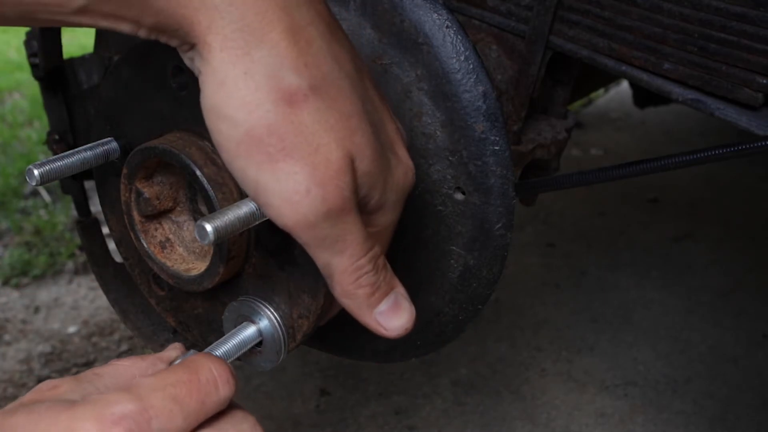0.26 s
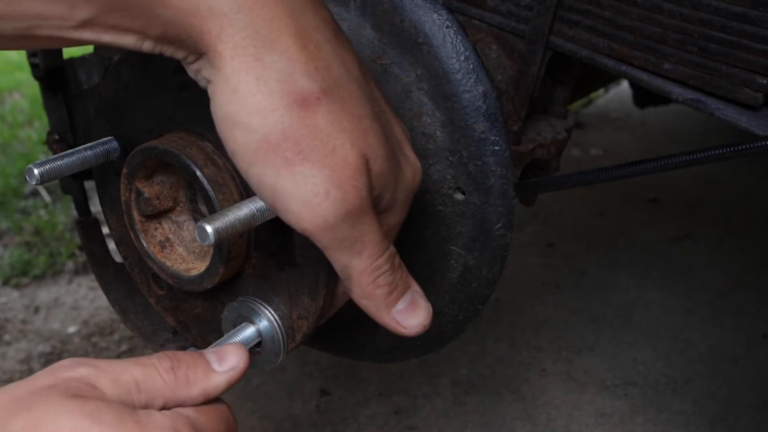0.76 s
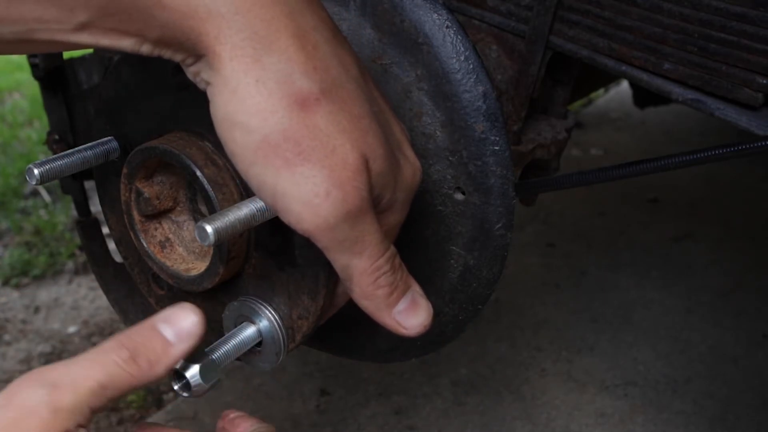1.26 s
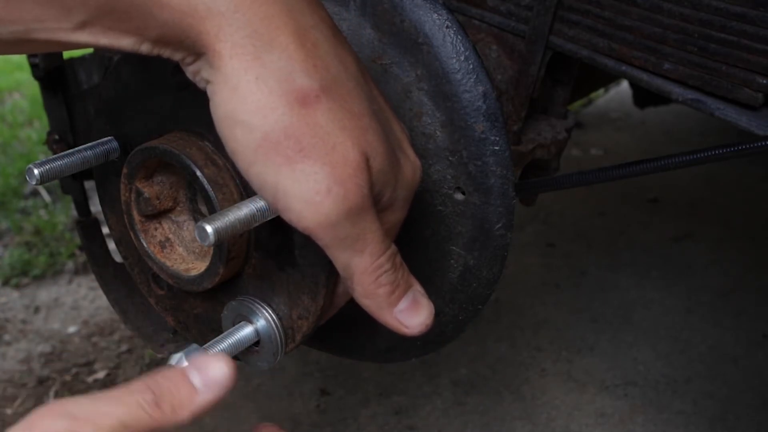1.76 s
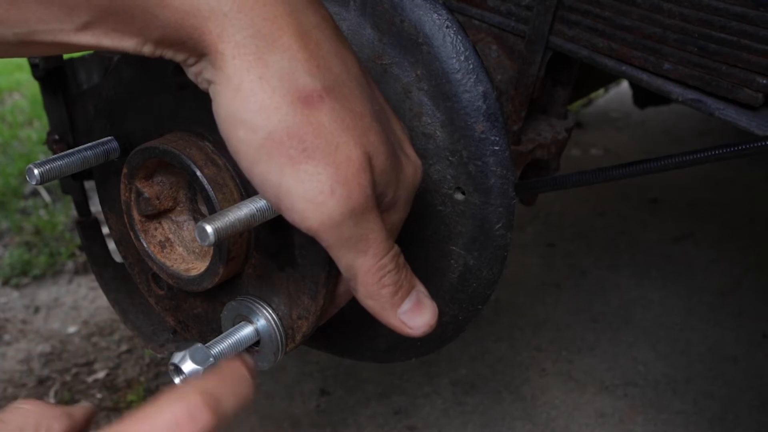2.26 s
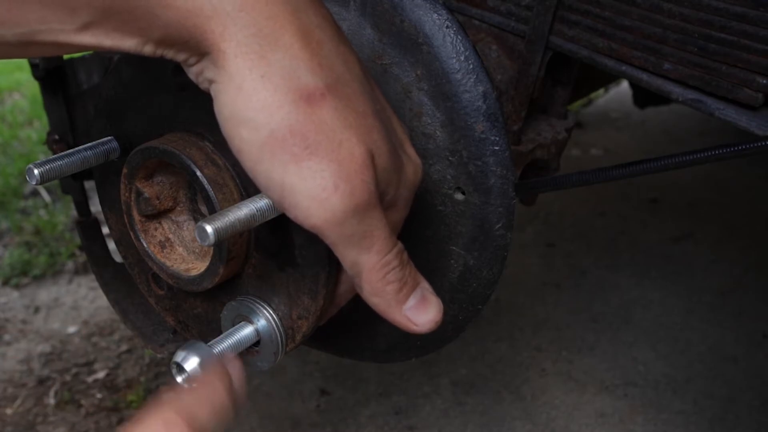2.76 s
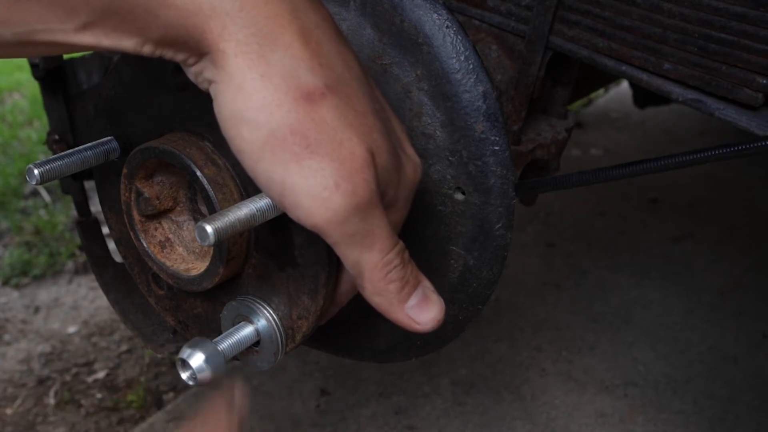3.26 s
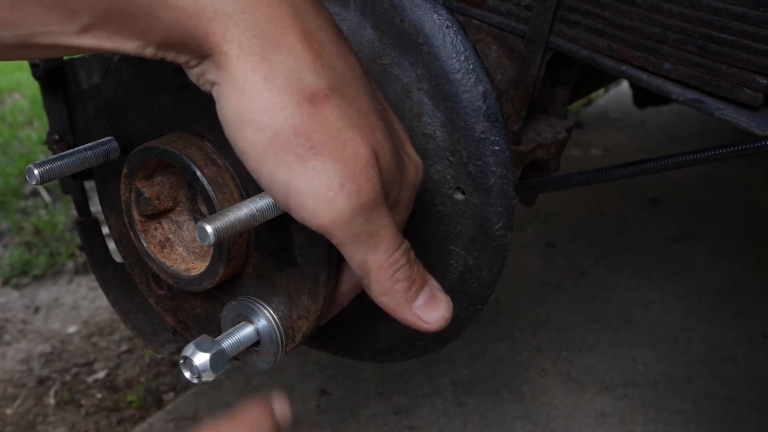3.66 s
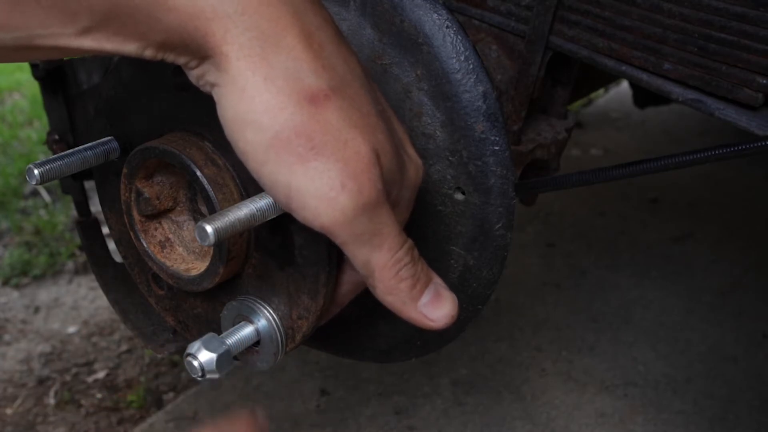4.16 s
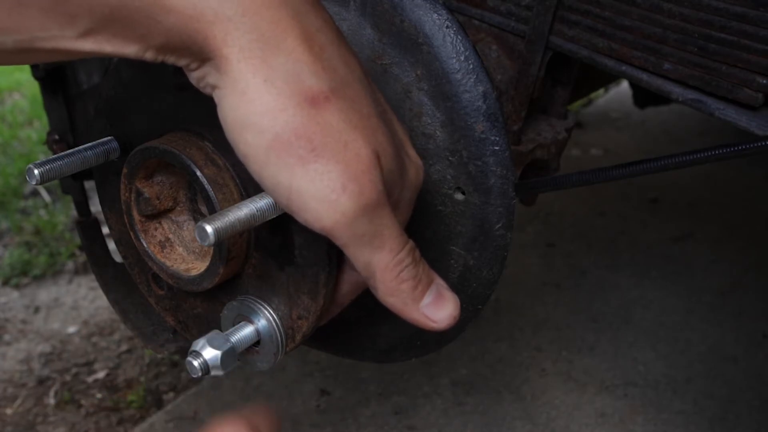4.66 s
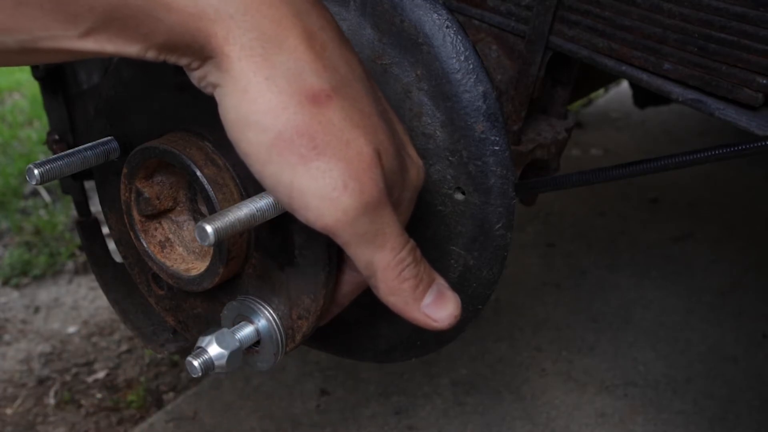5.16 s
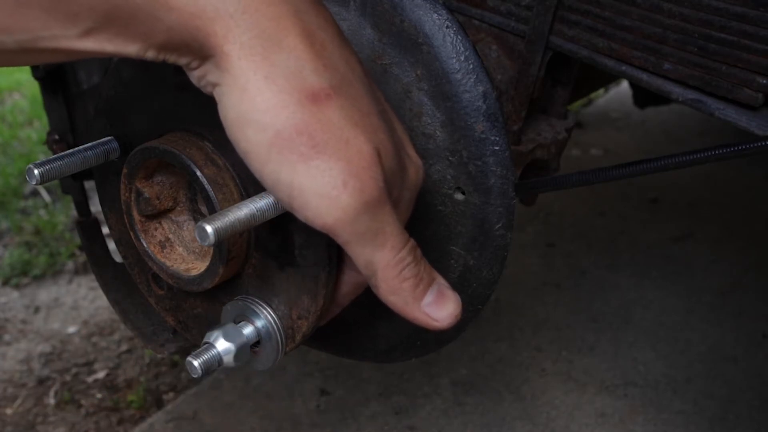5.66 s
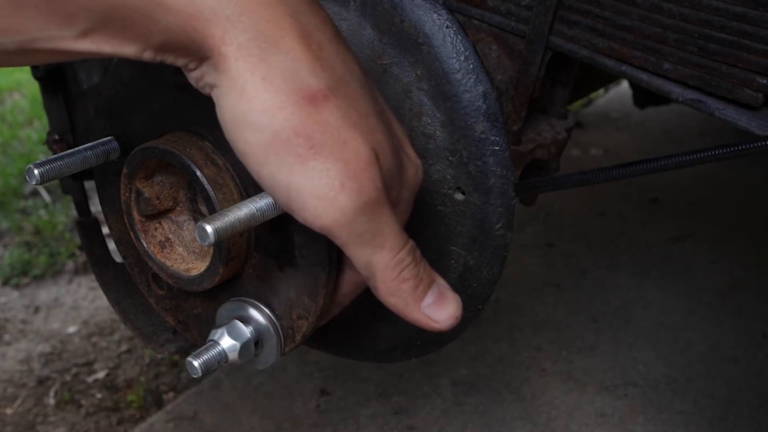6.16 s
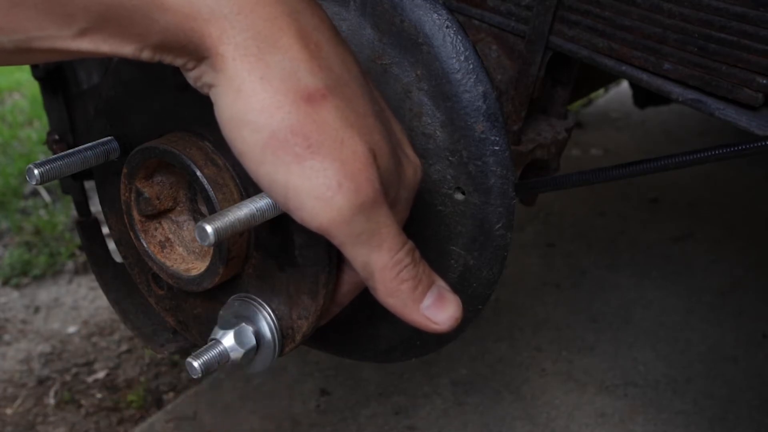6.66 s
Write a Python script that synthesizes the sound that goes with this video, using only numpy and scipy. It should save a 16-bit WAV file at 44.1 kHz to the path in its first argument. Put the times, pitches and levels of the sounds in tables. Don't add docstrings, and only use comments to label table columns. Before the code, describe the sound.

A stereo microphone near a rusty hub catches quiet metal rubs and ticks, then an even series of crisp, slightly ringing clicks as a loose nut is spun along a threaded stud. Each is trailed by a grainy buzz. Late strikes turn harder and clattery as the nut hits the washers. Low traffic, steady hum, light hiss, a passing engine and gliding bird notes stay in the background, with little echo.

```python
import sys
import numpy as np
from scipy import signal
from scipy.fft import rfft, irfft, next_fast_len
from scipy.io import wavfile
from scipy.ndimage import uniform_filter1d, map_coordinates

SR = 44100
rng = np.random.default_rng(int(sys.argv[2]) if len(sys.argv) > 2 else 0)


def how_loud(loudness_db):
    steps = np.asarray(loudness_db, float) / 20
    return 10 ** steps


def int16_out(signal):
    q = np.round(np.clip(np.atleast_2d(signal).T, -1, 1) * 32767)
    wavfile.write(sys.argv[1], SR, q.astype(np.int16))


N = 304696


def unit(x):
    return x / np.sqrt(np.mean(x ** 2) + 1e-20)


def along(points, hz):
    f, v = np.transpose(points)
    return np.interp(np.log(hz + 1), np.log(f + 1), v)


def wobble(rate):
    knots = rng.standard_normal(int(N * rate / SR) + 4)
    return map_coordinates(knots, [np.arange(N) * rate / SR])


def filtered(x, response):
    n = x.shape[-1]
    m = next_fast_len(n + 8192)
    return irfft(rfft(x, m) * response(np.fft.rfftfreq(m, 1 / SR)), m)[..., :n]


def resonant(peaks):
    def response(f):
        total = 0
        for k, (centre, width, db) in enumerate(peaks):
            band = 1j * f * width
            total = total + (-1) ** k * how_loud(db) * band / (centre * centre - f * f + band)
        return total
    return response


def spread(pair, alike, lean=((100, 0), (9000, 0))):
    def mid_side(hz):
        turn = np.arccos(np.clip(along(alike, hz), -1, 1)) / 2
        return np.array([np.cos(turn), np.sin(turn)])
    mid, side = filtered(pair, mid_side)
    return filtered(np.array([mid + side, mid - side]), lambda hz: how_loud(along(lean, hz) * [[.5], [-.5]]))


def dying(t60s, seconds):
    n = int(seconds * SR)
    hz, t, z = signal.stft(rng.standard_normal((2, n)), SR, nperseg=64)
    return signal.istft(z * how_loud(-60 * t / along(t60s, hz)[:, None]), SR, nperseg=64)[1][:, :n]


# (frequency [Hz], coherence [-1 to 1])
AIR_LIKENESS = [(30, .977), (70, .988), (130, .975), (290, .92), (640, .68), (1410, .3), (3100, -.25),
                (6820, .03), (15000, 0)]


def rush(response, patchy_db):
    z = signal.stft(rng.standard_normal((2, N)), nperseg=512)[2]
    field = uniform_filter1d(rng.standard_normal(z.shape[1:]), size=4, axis=0)
    field = uniform_filter1d(field, size=14, axis=1)
    pair = signal.istft(z * how_loud(patchy_db * unit(field)), nperseg=512)[1][:, :N]
    return unit(spread(filtered(pair, response), AIR_LIKENESS))


# (departure [s], arrival [s])
TRAVEL_S = (2.37, 6.64)


def frame_rocking(t):
    flick_s = np.array(FLICKS)[:, :1]
    since = np.clip(t - flick_s, 0, 9) / 0.066
    return np.max(since * np.exp(1 - since) * np.interp(flick_s, TRAVEL_S, [.6, 1]), axis=0)


# (time [s], effort [0-1])
PASS_EFFORT = [
    (.7, 0),
    (.85, 0.82),
    (1.05, 0.95),
    (1.2, 0.38),
    (1.45, 0.8),
    (1.75, 0.97),
    (2.15, 0.89),
    (2.35, 0.052),
]


def passing(t):
    return np.clip(np.interp(t, *np.transpose(PASS_EFFORT), left=0, right=0), 0, 2)


# (frequency [Hz], density [dB per Hz])
RUMBLE = [(13, -40), (25, -15), (42, -3.5), (59, 3), (102, -4.5), (110, -0.5), (124, -13.5), (170, -6.5),
          (220, -37), (370, -120)]
DRONE = [(65, -84), (110, -9), (124, -1.5), (183, -2.5), (312, -9), (330, -48), (430, -21), (730, -120)]
WHINE = [(190, -85), (320, -10), (374, -3), (427, -3), (467, -6.5), (560, -18), (730, -48), (1230, -120)]
RUSH = [(320, -15.5), (540, -8), (593, -2.5), (1060, -8), (1370, -9), (2460, -16), (3480, -18), (4000, -26),
        (5000, -33), (6500, -57), (11000, -120)]
# (time [s], level [dB])
TRAFFIC = [(0, -40.5), (.75, -42), (1.15, -39), (1.45, -39.5), (1.95, -38.5), (2.5, -40.5), (2.95, -40.5),
           (3.6, -40.5), (4.1, -42), (5.4, -42.5), (6.91, -44)]
# (level over mean traffic [dB], share of traffic swings [ratio], rise in the pass [dB],
#  rise when the frame rocks [dB], sway [dB])
LAYERS = [
    (1, 1.5, 0.5, 1.5, -2.5),
    (-4.5, 1.1, 1, 8, -1),
    (-7.5, 0.21, 3, 7, 3.2),
    (-10.5, 0.02, -1, -0.5, -1),
]


def far_traffic(t):
    traffic_db = np.interp(t, *np.transpose(TRAFFIC))
    mean_db = traffic_db.mean()
    effort, rocking = passing(t), frame_rocking(t)
    out = np.zeros((2, N))
    for (db, share, pass_db, rock_db, sway_db), points in zip(LAYERS, (RUMBLE, DRONE, WHINE, RUSH)):
        level_db = db + mean_db + share * (traffic_db - mean_db)
        level_db += pass_db * effort + rock_db * rocking
        level_db += np.clip(sway_db, -1.5, 1.5) * wobble(3.87)
        out += how_loud(level_db) * rush(lambda hz: how_loud(along(points, hz)), patchy_db=1.5)
    return out


# (frequency [Hz], pitch sway [Hz], level [dB])
HUM = [(96.1, 0.59, -45.5), (192.3, 7.4, -51), (287.4, 6.04, -52)]


def machine_hum():
    out = np.zeros(N)
    for hz, sway, db in HUM:
        phase = 2 * np.pi * np.cumsum(hz + sway * wobble(12)) / SR
        out += how_loud(db + 3 + 1.4 * wobble(5)) * np.sin(phase)
    return out


# (frequency [Hz], pitch sway [Hz], level [dB])
PASS_NOTE = (372, 18, -41.5)


def passing_engine(t):
    hz, sway, db = PASS_NOTE
    phase = 2 * np.pi * np.cumsum(hz + sway * wobble(30)) / SR
    return passing(t) * how_loud(db + 1.7 * wobble(7.86)) * np.sin(phase)


# (frequency [Hz], density [dB per Hz])
HISS = [(2500, -24), (4000, 2), (4800, -1.5), (6100, 2.5), (11500, 1), (14000, -5.5), (15750, -7),
        (15850, -60)]


def air():
    t = np.arange(N) / SR
    hiss = how_loud(-62) * rush(lambda hz: how_loud(along(HISS, hz)), patchy_db=-2.5)
    return hiss + far_traffic(t) + machine_hum() + passing_engine(t)


# (start [s], length [s], first pitch [Hz], last pitch [Hz], level [dB])
CLEAR_NOTES = [(0, .1, 4100, 4000, -75), (.12, .12, 5050, 5350, -76), (.41, .09, 2260, 2280, -71),
               (.68, .19, 5560, 5640, -81), (0, .18, 8000, 8000, -78), (.88, .07, 7250, 7050, -81),
               (.94, .07, 7050, 6300, -81),
               (1.735, 0.16, 3260, 3280, -69), (1.81, 0.125, 2700, 2720, -70), (2.7, 0.11, 2600, 2850, -75),
            (2.82, .14, 2810, 2780, -71), (2.93, 0.12, 3350, 3150, -65), (3.04, 0.26, 2650, 2630, -59.5),
            (4.071, .1, 3000, 3120, -64), (4.12, 0.09, 3040, 3020, -65), (3.506, 0.065, 2100, 2354, -59),
            (3.57, 0.1, 2535, 2530, -61), (3.67, .14, 2530, 2520, -68), (4.63, 0.11, 3060, 3075, -66),
            (4.085, .12, 2210, 2200, -69), (4.18, .05, 2300, 2400, -60), (3.6, .12, 2230, 2220, -67)]
WARBLES = [(2.249, 0.12, 3180, 3000, -74), (3.07, 0.25, 3170, 3150, -72), (3.405, 0.081, 3130, 3100, -64),
           (3.445, 0.07, 2600, 2500, -65), (3.45, .07, 2300, 2200, -67), (3.568, 0.17, 2250, 2330, -68),
           (3.953, 0.1, 2920, 2960, -63), (4.039, 0.14, 3111, 2967, -61), (3.961, 0.133, 2600, 2520, -65),
           (4.12, 0.094, 2500, 2670, -60), (4.19, 0.11, 2350, 2470, -65), (4.18, 0.13, 3030, 2950, -66),
           (2.94, 0.11, 3350, 3134, -64), (4.13, 0.16, 2760, 2680, -64), (4, .04, 2350, 2350, -66)]


def birds():
    t, out = np.arange(N) / SR, np.zeros(N)
    notes = [(*note, 8) for note in CLEAR_NOTES]
    notes += [(*note, 60) for note in WARBLES]
    for s, length, first_hz, last_hz, db, sway_hz in notes:
        u = np.clip((t - s) / length, 0, 1)
        pitch = first_hz + (last_hz - first_hz) * u + sway_hz * wobble(200)
        level = how_loud(db + 9 + 1.1 * wobble(25.36)) * np.sin(np.pi * u) ** 0.27
        out += level * np.sin(2 * np.pi * np.cumsum(pitch) / SR)
    return out


# (travel [0-1], drum [dB], overtone [dB], washer [dB], edge [dB])
PLACE = [
    (0, -26, -29.5, -24.5, 11.5),
    (.25, -25.5, -8, -19.5, 1),
    (.62, -16.5, -9.5, -19, 9.5),
    (1, -24, -12.5, -19, -6),
]


def place(s):
    travel = np.interp(s, TRAVEL_S, [0, 1])
    at, *columns = np.transpose(PLACE)
    return [travel] + [np.interp(travel, at, c) for c in columns]


# (start [s], length [s], level [dB], sizzle [dB])
RUBS = [(0.043, 0.065, -62, 3), (0.346, 0.035, -54, -6), (0.472, 0.018, -58, -9), (0.54, 0.42, -67.5, -14),
        (1.138, 0.037, -53.5, -9), (1.436, 0.065, -46, -8), (1.662, 0.12, -47.5, -8),
        (1.901, 0.08, -49.5, -6.5), (2.147, 0.063, -49, -4), (5.23, 0.025, -41.5, -14),
        (5.467, 0.023, -64, -15), (5.686, 0.1, -56, -9), (6.127, 0.077, -40, -1),
        (6.226, 0.17, -49.5, -6.5), (6.403, 0.058, -55, -12), (6.692, 0.079, -47.5, -11)]
# (time [s], peak [dB], stud ring [dB], whirr [dB], whirr length [s])
FLICKS = [(2.374, -14.5, -26.5, -47.5, 0.058), (2.601, -13.5, -12.5, -47.5, 0.052),
          (2.8195, -17, -9.5, -41, 0.093), (3.0651, -13.5, -16, -45.5, 0.08),
          (3.3116, -13.5, -14.5, -47.5, 0.074), (3.5582, -10, -15, -47.5, 0.084),
          (3.8101, -13, -15, -45, 0.11), (4.0639, -11.5, -18, -44.5, .058),
          (4.3129, -10, -16.5, -47, 0.097), (4.565, -13.5, -19.5, -46, 0.095),
          (4.8156, -13.5, -17, -47, 0.13), (5.073, -21, -15, -50.5, 0.1), (5.3309, -9, -18.5, -48, 0.13),
          (5.586, -15.5, -18, -39.5, 0.063), (5.8468, -8, -14, -52, 0.13), (6.1056, -12, -20, -57, .03),
          (6.3833, -14, -19.5, -46, 0.12), (6.6407, -11, -24, -53, 0.034)]
# (drum [dB], overtone [dB], washer [dB], hub knock over the usual [dB], ring length [ratio])
BITES = [(3.5, 4, 4.5, -6, 0.91), (1, 3, -0.5, -0.5, 0.86), (-3, 3, 2, 6, 1.1), (-2, -5, -6, 2, 0.92),
         (0.5, -3.5, 3, -2, 1.2), (2, -1.5, -2.5, 0, 0.93), (-5.5, -2.5, -0.5, -1, 1.07),
         (-1.5, -0.5, -2, -3, 0.88), (-3.5, 3, 3, 1.5, 0.79), (-3, -4.5, -1.5, -2, 0.94),
         (-0.5, 4, 5.5, 3, 0.99), (-3.5, -4, 3, -1.5, 1.26), (-0.5, 0, 0.5, 2, 0.98), (-1, 1.5, 0, 0, 0.9),
         (2.5, -4, 4, 0.5, 1), (-3, 1.5, -1, -4.5, 1.2), (2, -4, 4, -2.5, 0.8), (0.5, 6.5, -3, -3.5, 0.58)]


def runs():
    rows = []
    for (s, db, _, whirr_db, length), bite in zip(FLICKS, BITES):
        tip_loss_db = 13.5 * max(0, 1 - place(s)[0] / 0.33)
        knock_db = -43.5 + 0.16 * (db + 8.5) - tip_loss_db
        rows.append((s + 0.00407, length, whirr_db, -6.5, knock_db + bite[3]))
    return rows + [(*row, row[2] - 11.5) for row in RUBS]


# (frequency [Hz], width [Hz], level [dB])
THREAD = [(1700, 78, 6), (2536, 107, -1.5), (3740, 613, 9.5), (3934, 1280, 3), (5790, 430, -5)]
SIZZLE = [(7360, 900, -10.5), (10550, 290, 4), (12400, 3000, -20)]
RASP = [(14500, 3500, -5.5)]
# (frequency [Hz], coherence [-1 to 1])
CLOSE = [(700, .92), (1700, .8), (2600, .5), (3600, -.3), (5500, .3), (9000, 0), (13000, -.4)]
# (frequency [Hz], level difference [dB])
SIDE_DB = [(400, 0.5), (2400, -7), (3200, -3.5), (4400, -0.5), (8000, -4), (15000, 1.5)]


def thread_chatter():
    t = np.arange(N) / SR
    whirr, sizzle = np.zeros((2, N))
    for s, length, db, sizzle_db, _ in runs():
        u = np.clip((t - s) / length, 0, 3)
        run = how_loud(db) * np.clip((t - s) / 0.0056, 0, 1) * np.exp(-u ** 3 * 1.26)
        whirr += run
        sizzle += how_loud(sizzle_db) * run
    seated = np.interp(t, [5.5, 6.13], [0, 1])
    grains = unit(rng.standard_normal((2, N)) * how_loud(5.1 * wobble(70) + 1.7 * wobble(500)))
    chatter = filtered(grains * whirr, resonant(THREAD)) + filtered(grains * sizzle, resonant(SIZZLE))
    rasp = filtered(grains * sizzle ** 2 / how_loud(-40) * seated, resonant(RASP))
    return spread(how_loud(12.5) * chatter + how_loud(10.5) * rasp, CLOSE, SIDE_DB)


# (frequency [Hz], width [Hz], level [dB])
HUB = [(291, 30, -4.5), (402.6, 37, 1.5), (442.5, 22, -1), (477.3, 23, -2), (633, 160, -19.5),
       (772, 38, -7.5), (990, 72, -15)]


def hub_knock():
    t = np.arange(N) / SR
    tremor, push = np.zeros((2, N))
    for s, _, _, _, knock_db in runs():
        push[round(s * SR)] = how_loud(knock_db + 4.5)
        rise = np.clip((t - s) / 0.0049, 0, 1)
        tremor += how_loud(knock_db) * rise * how_loud(-60 * np.clip(t - s, 0, 9) / 0.36) * how_loud(0.5)
    push = np.convolve(push, np.hanning(24))[:N]
    force = rng.standard_normal((2, N)) * tremor + push * [[1], [0]]
    thud = filtered(force, resonant(HUB)) * how_loud(34.0)
    return spread(thud, [(300, 0.87), (900, 0.95)], SIDE_DB)


# (time [s], peak [dB], drum [dB], stud ring [dB])
TOUCHES = [(0.0516, -44, -5, -34.5), (0.2032, -35.5, -12, -18), (0.361, -26, -21.5, -37),
           (0.368, -41, -13, -35), (1.14, -45, -14, -13), (1.158, -47, -13, -17), (1.452, -27.5, -22, -22),
           (1.489, -30.5, -18, -28), (1.666, -38, -1.5, -12.5), (1.72, -46, -7, -13),
           (1.7888, -28, -33, -39), (1.909, -42, -4, -9), (2.146, -36, -21, -23), (3.734, -39, -24, -37),
           (1.468, -33, -21, -22), (1.695, -42, -12, -21), (1.75, -37, -22, -22), (1.93, -37, -14, -22),
           (1.955, -39, -10, -26), (2.165, -34, -18, -24), (2.19, -38, -20, -24), (5.715, -33, -27, -30),
           (6.4245, -17, -28, -28), (2.845, -34, -22, -26), (2.89, -34, -20, -28), (3.115, -31, -20, -28),
           (5.415, -36, -24, -30)]


def touches():
    return [(s, db, drum, stud, stud + 6, drum - 8, 10, 0, 1, (-8, -8)) for s, db, drum, stud in TOUCHES]


# (main note [dB], top notes [dB])
CHIMES = [(-2, -10), (-4, -6), (-6, -6), (-3, -6), (-6, -8), (-5, -7), (-4, -5), (-4, -7), (-5, -13),
          (-1, -3), (-8, -4), (-2, -1), (-2, 5), (1, 3), (4, 4), (-3, 5), (0, 1), (6, 1)]


def flicks():
    rows = []
    for (s, db, stud, *_), bite, chime in zip(FLICKS, BITES, CHIMES):
        drum_db, high_db, washer_db, _, lasts = bite
        _, drum, high, washer, edge = place(s)
        less_db = 0.67 * (db + 17.0)
        rows.append((s, db, drum - less_db + drum_db, stud, high - less_db + high_db,
                     washer + washer_db, edge - washer_db, 0, lasts, chime))
    return rows


# (time [s], peak [dB], drum [dB], stud ring [dB], washer [dB])
LANDINGS = [
    (5.6149, -15.5, -12, -28, -8),
    (6.137, -16, -22.5, -42, -6),
    (6.1489, -17.5, -16, -16, -2),
    (6.167, -10.5, -24, -22, -10),
    (6.429, -4, -23.5, -21.5, -7),
    (6.6836, -23, -10, -10, 0),
    (6.6886, -5, -23.5, -21, -10),
]
# (overtone [dB], upper washer notes [dB], edge over the usual [dB], ring length [ratio])
SEATS = [(5, 3.5, 6, 0.68), (2, 3.5, 13, 0.54), (3, 1.5, 8, 0.59), (-2, 1, 10, 0.76), (-5, 2, -6, 1.07),
         (-2, -8, -1, 1.04), (4, -7, -18, 1.03)]


def landings():
    rows = []
    for (s, db, drum, stud, washer), (high_db, upper_db, edge_db, lasts) in zip(LANDINGS, SEATS):
        edge = place(s)[-1] - 16 + edge_db
        rows.append((s, db, drum, stud, -17 + high_db, washer, edge, upper_db, lasts, None))
    return rows


# (frequency [Hz], level [dB], t60 [s])
DRUM_STEEL = [(1176, -28.5, 0.21), (1803, -19.5, 0.068), (2285, -39.5, 0.66), (2360, -45, 0.088),
              (2484, -14.5, 0.044)]
STUD_STEEL = [(3150, -16, 0.035), (3640, -8, 0.029), (3780, -8, 0.029), (4100, -2.5, 0.024),
              (4766, -11, 0.036), (5550, -13, 0.09), (5670, -2, 0.018), (3945, -8, 0.075), (3933, -17, 0.2)]
NUT_STEEL = [(10470, -23, 0.032)]
LOOSE_STEEL = [(1680, -13, 0.07), (1750, -9, 0.06), (10850, -17, 0.05), (11965, -18, 0.04),
               (13585, -19, 0.03), (7705, -6, 0.04)]
SEATED_STEEL = [(1662, -10, 0.072), (7115, -7.5, 0.028), (7400, -16, 0.037), (8070, -10, 0.025),
                (12400, -33, 0.025), (13400, -34, 0.02)]
# (frequency [Hz], left lead [rad])
LEAN = [(1650, -3.5), (2500, -4), (3150, -7), (3600, -5), (3935, 8), (4250, 3), (4800, 2), (5570, 3),
        (7100, 0), (8000, -1)]
LEAD = [(1650, .2), (1780, .7), (2500, .5), (3150, -.4), (3600, 2.3), (3935, 1.3), (4800, -.4), (5570, 1.3),
        (7100, 1.8)]


def steel_ring(t, db, tones, upper, lasts, chime):
    drum, low, high, washer = tones
    modes = DRUM_STEEL + STUD_STEEL + NUT_STEEL + LOOSE_STEEL + SEATED_STEEL
    hz, level, t60 = np.array(modes).T[:, :, None]
    loose = np.isin(hz, np.array(LOOSE_STEEL)[:, 0])
    seated = np.isin(hz, np.array(SEATED_STEEL)[:, 0])
    colour = [(1900, drum), (2400, 0), (3600, 0), (3935, low), (4200, 0), (5570, high), (7130, washer),
              (7700, washer + upper), (8100, washer + upper), (10000, washer + upper / 2)]
    free = lasts * np.interp(db, [-30, -22], [.45, 1])
    if chime is None:
        family_db = loose * -8
    else:
        chime_db = np.interp(hz, [2000, 7700, 11000, 11900], [0, chime[0], 0, chime[1]])
        family_db = seated * -11 + loose * chime_db
    knots = rng.standard_normal((len(hz), 42))
    flutter = 2.3 * np.array([np.interp(t * 60, np.arange(42), row) for row in knots])
    level_db = along(colour, hz) + level + flutter + family_db
    level_db = level_db + knots[:, -1:] * np.where(hz > 6500, 1.2, 0) - 60 * t / (t60 * free)
    gain = how_loud(level_db) * (1 - np.exp(-t / 0.0012))
    phase = 2 * np.pi * hz * (1 + 0.0014 * rng.standard_normal(hz.shape)) * t
    lean, lead = along(LEAN, hz), along(LEAD, hz)
    return np.array([np.sum(gain * how_loud(k * lean) * np.sin(phase + k * lead), axis=0) for k in (.5, -.5)])


# (frequency [Hz], density [dB per Hz])
CRACK = [(410, -61), (700, -7.5), (1650, -9.5), (2920, -1), (3960, 4.5), (5650, -20.5), (6540, -6),
         (7170, -15.5), (11400, -9), (12700, -29), (14500, -39), (16500, -100)]
# (frequency [Hz], t60 [s])
FADE = [(1000, 0.13), (4000, 0.022), (9000, 0.02), (15000, 0.096)]


def crack(t, tones, edge, upper):
    drum, _, _, washer = tones
    noise = dying(FADE, .5) + 3 * how_loud(-60 * t / 0.0026) * rng.standard_normal(len(t))
    noise[:, 2] += 4.5
    broad = [(1200, drum - 5), (1700, drum), (3500, 0.0043), (7500, washer), (9500, washer + upper),
             (12500, washer + edge), (15500, washer + edge - 8)]
    noise = filtered(noise, lambda f: how_loud(along(CRACK, f) + along(broad, f)))
    return how_loud(2.5) * spread(noise, CLOSE, SIDE_DB)


# (drum [dB], stud [dB], overtone [dB], washer [dB])
TYPICAL_DB = (-21.25, -21.75, -19.5, -18.75)


def clicks():
    out, t = np.zeros((2, N + SR)), np.arange(SR // 2) / SR
    for s, db, *tones, edge, upper, lasts, chime in touches() + flicks() + landings():
        tones = np.subtract(tones, TYPICAL_DB)
        sound = steel_ring(t, db, tones, upper, lasts, chime) + crack(t, tones, edge, upper)
        out[:, round(s * SR):][:, :len(t)] += how_loud(db - 7.0) * sound
    return out[:, :N]


# (time [s], frequency [Hz], level [dB])
DRUM_NOTES = [(4.063, 1400, -65), (4.816, 1400, -57), (5.33, 1405, -54), (5.614, 1405, -55),
              (5.847, 1405, -53), (5.615, 1805, -51), (6.168, 1803, -65), (6.43, 1780, -49),
              (6.688, 1780, -48)]


def drum_notes():
    out, t = np.zeros(N + SR), np.arange(SR) / SR
    for s, hz, db in DRUM_NOTES:
        start = round(s * SR)
        out[start:start + SR] += how_loud(db - 60 * t / 1.2) * np.sin(2 * np.pi * hz * (t + start / SR))
    return out[:N]


# (frequency [Hz], t60 [s])
YARD = [(300, 0.59), (2000, 0.14), (10000, 0.089)]


def yard(x):
    tail = dying(YARD, 0.54)
    late = np.pad(x, (300, 0))[None]
    return signal.fftconvolve(late, tail / np.linalg.norm(tail[0]), axes=1)[:, :N]


def scene():
    background, song = air(), birds()
    whirr = thread_chatter() + hub_knock()
    strikes = clicks() + drum_notes()
    echo = how_loud(-10.0) * yard(strikes[1] + whirr[1]) + how_loud(-2) * yard(song)
    soft = filtered(whirr + echo + background, lambda hz: hz < 15850)
    return strikes + soft + song * how_loud([[-1.5], [1.5]])


def low_pass(x):
    return signal.sosfilt(signal.butter(12, 16690, fs=SR, output="sos"), x)


def record(dry):
    held = dry / (1 + np.abs(dry / .88) ** 6) ** (1 / 6)
    t = np.arange(N) / SR
    since = t - np.array(FLICKS + [LANDINGS[-1]])[:, :1]
    clatter = np.abs(t - np.array(LANDINGS)[:, :1] - .008).min(axis=0) < .012
    dip = np.any((since > .004) & (since < .032), axis=0) * ~clatter * 1.
    held = held - uniform_filter1d(dip, size=160) * filtered(held, lambda hz: hz > 14200)
    return low_pass(filtered(held, lambda hz: hz < 16600))


dry = scene()
out = record(dry)
int16_out(out)
```